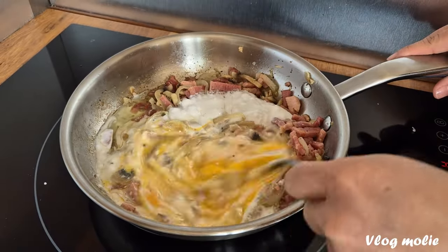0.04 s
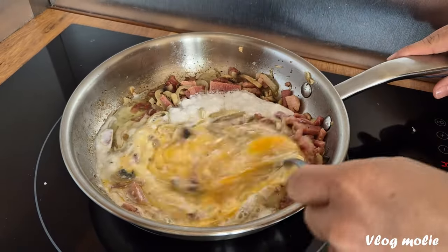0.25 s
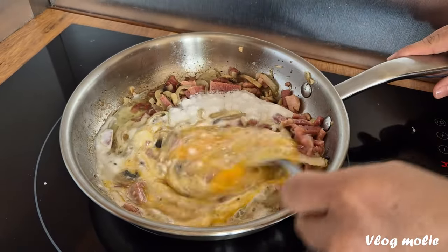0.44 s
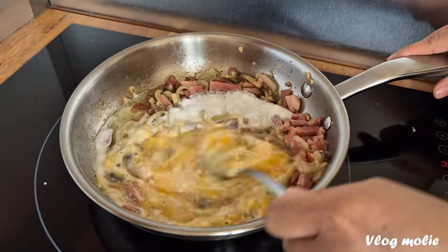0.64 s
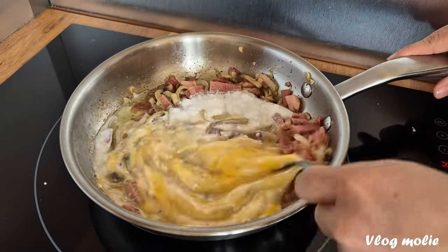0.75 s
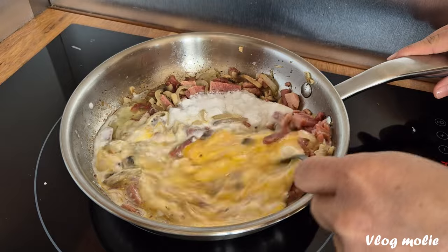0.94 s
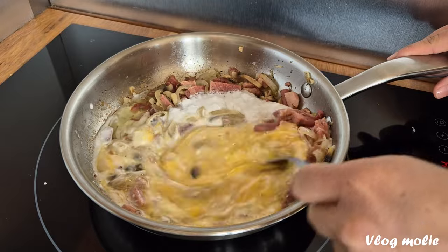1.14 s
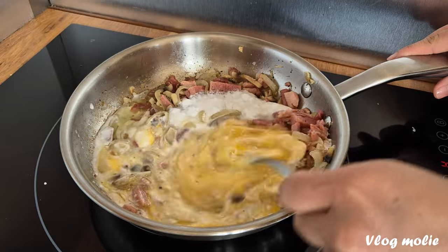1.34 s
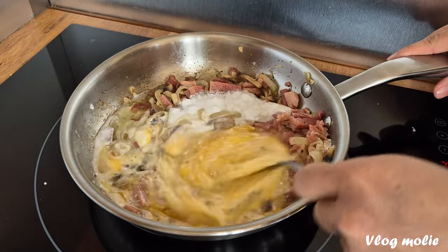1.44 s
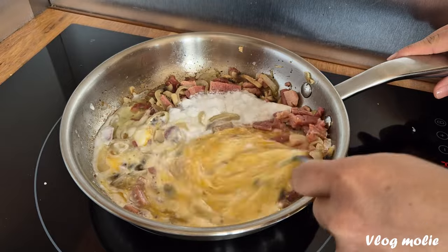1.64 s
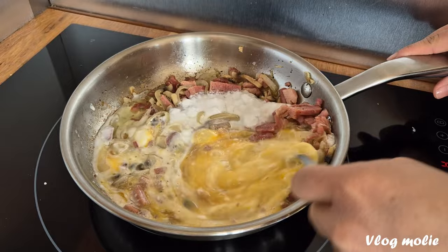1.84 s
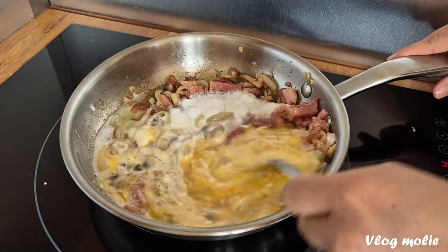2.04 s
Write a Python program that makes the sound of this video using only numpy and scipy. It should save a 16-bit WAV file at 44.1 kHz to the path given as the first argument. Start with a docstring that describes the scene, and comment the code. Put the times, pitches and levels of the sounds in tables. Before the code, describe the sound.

A fork beats eggs in a steel frying pan with quick, wet clacks.

```python
"""A fork beats eggs in a steel frying pan, close by in a small kitchen.
From the start, froth crackles over a low hum and the pan rocks on the hob; the egg smacks and squelches.
From 0.2 s to 2 s come eleven strokes, nearly six a second. At each, the tines clack on the egg-damped
steel, an air pocket plops, the pan thumps, and the fork swishes on with rising pitch.
The egg squelches between strokes and briefly after the last."""
import sys
import numpy as np
from scipy import signal
from scipy.fft import rfft, irfft
from scipy.io import wavfile
from scipy.ndimage import uniform_filter1d

SR = 44100
rng = np.random.default_rng(int(sys.argv[2]) if len(sys.argv) > 2 else 0)


def unload_wav(signal):
    """Save mono or channel-first audio to the path in sys.argv[1] as 16-bit WAV at rate SR, clipped to [-1, 1]."""
    wavfile.write(
        sys.argv[1],
        SR,
        np.round(np.clip(np.atleast_2d(signal).T, -1, 1) * 32767).astype(np.int16),
    )


N = 92610

# Spectra: freq_hz, gain_db
HUM_SPECTRUM = [(20, -34), (45, -1.5), (65, -4), (120, -6), (190, -17), (330, -27), (1000, -34.5),
                (4000, -33.5), (16000, -50.5)]
FROTH_SPECTRUM = [(350, -11), (600, -26), (850, 9), (1200, -1.5), (1600, 3), (3000, 7), (6000, 0),
                  (10000, -7.5), (16000, -22)]
SMACK_SPECTRUM = [(400, -36.5), (1500, -7), (4000, -9.5), (7000, -8), (11000, -18.5), (16000, -20)]
CLACK_SPECTRUM = [(250, -17), (330, -26), (480, -32.5), (620, -34.5), (760, -8), (950, -4), (1200, -19),
                  (1800, -15), (2200, -4), (2550, -5.5), (2900, 3), (3500, -7.5), (4100, 2), (4700, 10),
                  (5300, 1.5), (5900, -12.5), (6450, -5), (7000, -10), (8800, -7.5), (10300, -14),
                  (11900, -8.5), (15500, -20)]
THUD_SPECTRUM = [(40, -18), (130, 1), (200, -22.5), (260, -5), (340, -24.5), (1000, -79.5)]
SWISH_SPECTRUM = [(500, -40), (1500, -58), (2500, -4.5), (4500, 8.5), (9000, 1), (13000, -10), (16000, -53)]
SPRAY_SPECTRUM = [(1000, -37), (5000, -8.5), (8000, 6.5), (11000, -3), (15000, -7)]
# Froth envelope: time_s, gain_db
FROTH_ENVELOPE = [(0, 9), (.08, -3.5), (.15, -9), (.3, -4), (.45, 5), (1.101, 8), (1.6, 3), (2.1, 8)]
# Pushes that rock the pan: start_s, push_db
ROCKS = [(.028, -41), (.2, -38.5), (0.398, -42.5), (0.577, -50), (0.92, -42.5), (1.098, -46),
         (1.281, -49.5), (1.455, -47.5), (1.634, -49.5), (1.81, -54)]
# Rocking modes: pitch_hz, gain_db, t60_s
SWAY_MODES = [(45.1, 3.5, 0.35), (80.2, -2.5, 0.23), (131.5, -6, 0.24)]
# Egg leaving the fork: start_s, level_db, t60_s
SMACKS = [(.101, -47.5, 0.042), (0.246, -55, 0.018), (0.191, -40, 0.071), (0.318, -49.5, 0.027),
          (0.37, -50, 0.057), (0.387, -36, 0.13), (0.712, -44, 0.021), (0.841, -47, .025),
          (.891, -30.5, 0.1), (1.076, -36.5, 0.14), (2.082, -46, 0.061)]
# Air pockets in the egg: start_s, pitch_hz, level_db, t60_s
SQUELCHES = [(.116, 1506, -44.5, 0.038), (.198, 570, -42, 0.089), (.211, 880, -46, 0.055),
             (.261, 810, -41.5, 0.027), (.321, 453, -43.5, 0.067), (.322, 880, -43.5, 0.019),
             (0.321, 1365, -39.5, 0.094), (.324, 2140, -44.5, 0.057), (.436, 1535, -48, 0.019),
             (.496, 1495, -41, 0.025), (.498, 409, -43, 0.052), (.499, 2020, -55, 0.036),
             (.575, 585, -45, 0.13), (.601, 1980, -39.5, 0.014), (.660, 749, -41.5, 0.094),
             (.670, 1390, -49.5, 0.039), (.731, 817, -45, .05), (.841, 2170, -40, 0.026),
             (.878, 887, -39.5, 0.091), (.892, 1570, -37.5, 0.013), (.968, 945, -65, 0.059),
             (1.017, 2290, -46, 0.025), (1.070, 748, -36.5, 0.052), (1.249, 1470, -50, 0.019),
             (1.392, 917, -39.5, 0.12), (1.403, 1350, -52, 0.035), (1.589, 1510, -49, 0.061),
             (1.753, 3590, -43.5, 0.018), (1.828, 883, -38, 0.071), (2.019, 5570, -39.5, 0.01),
             (2.034, 3970, -41, 0.024), (2.081, 865, -50, 0.12), (2.081, 2217, -43, .06)]
# Fork strokes: start_s, clack_low_db, clack_mid_db, clack_top_db, clink_hz,
# plop_hz, plop_db, plop_t60_s, swish_db, swish_peak_s, thump_db
STROKES = [(0.197, -46.5, -50.5, -50, 4580, 825, -31.5, 0.012, -62.5, 0.084, -42),
           (.3950, -25.5, -19.5, -22, 5054, 738, -34, 0.033, -34.5, 0.029, -34),
           (0.5732, -32.5, -21, -23, 5350, 862, -44, 0.02, -37, 0.02, -38.5),
           (0.751, -29, -21.5, -27, 4586, 784, -32, 0.044, -33.5, 0.015, -53),
           (0.9143, -19.5, -22.5, -21, 4780, 885, -20.5, 0.063, -33.5, 0.039, -38),
           (1.0977, -21, -19, -21, 4445, 844, -37, 0.026, -34.5, 0.038, -42.5),
           (1.2799, -24, -20, -24.5, 4693, 790, -34, 0.036, -31.5, 0.036, -42.5),
           (1.4549, -24.5, -23.5, -24, 4540, 846, -32.5, .035, -33, 0.034, -38.5),
           (1.6288, -22, -23, -26.5, 4650, 876.5, -30, 0.063, -37, 0.04, -43),
           (1.8048, -22.5, -23, -29, 5060, 814, -36.5, 0.038, -36, .033, -44),
           (1.9826, -32, -35.5, -37, 3960, 921, -38.5, 0.034, -47, 0.028, -47)]
# Tines landing in turn: delay_s, gain_db
TINES = [(0, 1), (.0008, 12), (.0017, 3.5), (.0027, 4.5), (.0038, -1)]
# Ringing modes of the pan: pitch_hz, gain_db, t60_s
PAN_MODES = [(910, 18, 0.26), (975, 13, 0.78), (1850, -20, 0.23), (2190, -15, .25), (2333, 34, 0.14),
             (2750, -6, 0.22), (2812, -15, .25), (3000, 29, 0.39), (3430, 24, 0.37), (3900, 4.5, 0.096),
             (4300, -23, 0.18), (4500, -24, .2), (4500, -5, .22), (4750, -6, .2), (5600, 10, 0.19),
             (6421, 7, .25), (11896, 3, .12)]
# Room decay: freq_hz, t60_s
KITCHEN_DECAY = [(100, 0.9), (800, 0.33), (2500, 0.34), (5000, 0.27), (9000, 0.24), (15000, 0.31)]

T = np.arange(SR // 2) / SR  # time within one event, s


def amp(db):
    """Decibels to gain."""
    return 10 ** (np.asarray(db) / 20)


def unit_rms(x):
    """Scale to rms 1."""
    return x / np.sqrt(np.mean(x ** 2) + 1e-20)


def burst(x):
    """Scale to the energy of 10 ms at rms 1."""
    return x / np.sqrt(np.mean(np.sum(x ** 2, -1)) / (SR / 100) + 1e-20)


def fade(t60_s, t=T):
    """Exponential decay, 60 dB in t60_s."""
    return np.exp(-np.log(1000) * t / t60_s)


def lookup(table, hz):
    """Interpolate over log frequency."""
    freq_hz, value = np.transpose(table)
    return np.interp(np.log(hz + 1), np.log(freq_hz), value)


def add(mix, start_s, sound):
    """Mix in at start_s."""
    part = mix[:, round(start_s * SR):][:, :sound.shape[-1]]
    part += sound[..., :part.shape[1]]


def colour(x, spectrum):
    """Minimum-phase filter with the given spectrum."""
    log_gain = np.log(amp(lookup(spectrum, abs(np.fft.fftfreq(4096, 1 / SR)))))
    taps = np.fft.ifft(np.exp(np.conj(signal.hilbert(log_gain)))).real
    return signal.fftconvolve(x, taps[None], axes=1)[:, :x.shape[1]]


def stereo_noise(samples=len(T)):
    """White noise, partly shared by the channels."""
    noise = rng.standard_normal((3, samples))
    return 0.6 * noise[0] + 0.8 * noise[1:]


def jitter(smooth_samples):
    """Smoothed noise, rms 1."""
    return unit_rms(uniform_filter1d(rng.standard_normal(len(T)), smooth_samples))


def resonate(x, hz, width_hz):
    """Resonance following a pitch curve."""
    carrier = np.exp(2j * np.pi * np.cumsum(hz) / SR)
    pole = np.exp(-np.pi * width_hz / SR)
    return 2 * (carrier * signal.lfilter([1 - pole], [1, -pole], x / carrier)).real


def hum(level_db=-54):
    """Low, steady room noise, nearly mono."""
    noise = rng.standard_normal(N) + 0.33 * rng.standard_normal((2, N))
    return amp(level_db) * unit_rms(colour(noise, HUM_SPECTRUM))


def froth(base_db=-57.5, spread_db=2.2, pops_per_cycle=0.0275, t60_cycles=20):
    """Tiny bubbles pop in the stirred egg; the higher the pitch, the more often."""
    out, t = np.zeros((2, N)), T[:4000]
    for hz in np.geomspace(400, 15000, 40):
        strength = amp(spread_db * np.minimum(rng.exponential(1, N), 4))
        onsets = rng.random(N) < pops_per_cycle * hz / SR
        pop = np.sin(2 * np.pi * hz * t) * np.sqrt(t * hz) * fade(t60_cycles / hz, t)
        kicks = strength * onsets * stereo_noise(N)
        out += np.sqrt(hz) * signal.oaconvolve(kicks, pop[None], axes=1)[:, :N]
    envelope_db = np.interp(np.arange(N) / SR, *np.transpose(FROTH_ENVELOPE))
    return amp(base_db + envelope_db) * unit_rms(colour(out, FROTH_SPECTRUM))


def rock(push_db, swell_s=0.04):
    """The pushed pan sways on the hob in three low modes."""
    sway = sum(amp(db) * np.sin(2 * np.pi * hz * T) * fade(t60_s) for hz, db, t60_s in SWAY_MODES)
    return 2.9 * amp(push_db) * sway * (1 - np.exp(-T / swell_s))


def smack(level_db, t60_s):
    """Egg leaves the fork: a wet noise burst."""
    return amp(level_db) * burst(colour(stereo_noise() * fade(t60_s), SMACK_SPECTRUM))


def squelch(hz, level_db, t60_s, rise_per_s=1.8, roughness=0.48, attack_s=0.0024):
    """A ragged bubble in thick egg, rising slightly in pitch."""
    glide_hz = hz * (1 + rise_per_s * T)
    width_hz = 0.18 * hz
    envelope = (1 - np.exp(-T / attack_s)) * fade(t60_s)
    ragged = resonate(resonate(stereo_noise(), glide_hz, width_hz), glide_hz, 2 * width_hz)
    clean = np.sin(2 * np.pi * np.cumsum(glide_hz) / SR)
    bubble = (1 - roughness) * burst(clean * envelope) + roughness * burst(ragged * envelope)
    return amp(level_db) * burst(bubble)


def steel_mode(hz, t60_s, attack_s=0.002):
    """One damped mode, its phase a little different per channel."""
    phase = 2 * np.pi * rng.random() + 0.52 * rng.standard_normal((2, 1))
    return burst(np.sin(2 * np.pi * hz * T + phase) * np.minimum(T / attack_s, 1) * fade(t60_s))


def clack(low_db, mid_db, top_db, clink_hz, scatter_db=3):
    """Tines hit the pan: dense damped modes, the base's knock, the fork's clink, a faint ring."""
    hits = np.zeros((2, len(T)))
    envelope = fade(t60_s=0.021) + amp(-7) * fade(t60_s=0.08)
    for delay_s, db in TINES:
        add(hits, delay_s, amp(db) * stereo_noise() * envelope)
    hits = colour(hits, CLACK_SPECTRUM)
    impact = 0
    for band_hz, db in (([200, 3500], low_db), ([3500, 6500], mid_db), ([6500, 18000], top_db)):
        bandpass = signal.butter(4, band_hz, "band", fs=SR, output="sos")
        impact += amp(db) * burst(signal.sosfilt(bandpass, hits))
    ring = sum(amp(db + scatter_db * rng.standard_normal()) * np.sqrt(t60_s) * steel_mode(hz, t60_s)
               for hz, db, t60_s in PAN_MODES)
    knock = amp(low_db - 5.5) * steel_mode(hz=2227, t60_s=0.028)
    clink = amp(mid_db - 3) * steel_mode(clink_hz, t60_s=0.04)
    return impact + knock + clink + amp((low_db + mid_db) / 2 - 15.5) * burst(ring)


def plop(hz, level_db, t60_s, rise_per_s=4, attack_s=0.002):
    """The air pocket behind the fork rings, rising in pitch as it closes."""
    cycles = np.cumsum(hz * (1 + rise_per_s * T)) / SR
    envelope = (1 - np.exp(-T / attack_s)) * fade(t60_s)
    return amp(level_db) * burst(np.sin(2 * np.pi * cycles) * envelope)


def thump(gain_db, pitch_hz=117.4):
    """The blow pushes the whole pan against the hob."""
    tone = np.sin(2 * np.pi * pitch_hz * T) * fade(t60_s=0.066)
    thud = colour(rng.standard_normal((1, len(T))) * fade(t60_s=0.048), THUD_SPECTRUM)
    return amp(gain_db) * (burst(tone) + amp(-3) * burst(thud))


def swish(gain_db, peak_s):
    """Tines slide through egg: grainy hiss with a rising resonance, then fine spray."""
    floor_hz, at_peak_hz, ceiling_hz, bend_s = 4100, 5300, 9300, 0.014
    grain_db, wander, width_hz, whistle_share = 3.2, 0.09, 1500, 0.54
    attack_s, spread_s, spray_lag_s, spray_spread_s = 0.0056, 0.014, 0.014, 0.0072
    rub = stereo_noise() * amp(grain_db * jitter(60))
    sweep_hz = floor_hz + (at_peak_hz - floor_hz) * np.exp((T - peak_s) / bend_s)
    sweep_hz = np.minimum(sweep_hz, ceiling_hz) * (1 + wander * jitter(200))
    whistle = unit_rms(resonate(resonate(rub, sweep_hz, width_hz), sweep_hz, width_hz))
    hiss = unit_rms(colour(rub, SWISH_SPECTRUM))
    slide = unit_rms(whistle_share * whistle + (1 - whistle_share) * hiss)
    slide *= np.minimum(T / attack_s, 1) / np.cosh((T - peak_s) / spread_s)
    spray = unit_rms(colour(rub, SPRAY_SPECTRUM))
    spray /= np.cosh(np.minimum(abs(T - peak_s - spray_lag_s) / spray_spread_s, 20))
    return amp(gain_db) * (slide + amp(-0.5) * spray)


def kitchen(x, gain_db=-9.5, predelay_s=0.003, attack_s=0.0027, low_cut_hz=250):
    """Room reflections: a short diffuse tail, longest in the bass."""
    hz, t, noise = signal.stft(rng.standard_normal((2, len(T))), SR, nperseg=256)
    decay = fade(lookup(KITCHEN_DECAY, hz)[:, None], t)
    tail = signal.istft(noise * decay, SR, nperseg=256)[1][:, :len(T)]
    tail *= np.clip((T - predelay_s) / attack_s, 0, 1)
    highpass = signal.butter(2, low_cut_hz, "high", fs=SR, output="sos")
    tail = signal.sosfilt(highpass, tail / np.linalg.norm(tail[0]))
    return amp(gain_db) * signal.fftconvolve(x, tail, axes=1)[:, :N]


def scene():
    """The pan, slightly left of centre, in the humming kitchen."""
    right_lag_s, tilt_db = 76e-6, 1.03
    pan = froth()
    for (start_s, low_db, mid_db, top_db, clink_hz,
         plop_hz, plop_db, plop_t60_s, swish_db, swish_peak_s, thump_db) in STROKES:
        add(pan, start_s, clack(low_db, mid_db, top_db, clink_hz))
        add(pan, start_s, plop(plop_hz, plop_db, plop_t60_s))
        add(pan, start_s, swish(swish_db, swish_peak_s))
        add(pan, start_s, thump(thump_db))
    for start_s, pitch_hz, level_db, t60_s in SQUELCHES:
        add(pan, start_s, squelch(pitch_hz, level_db, t60_s))
    for start_s, level_db, t60_s in SMACKS:
        add(pan, start_s, smack(level_db, t60_s))
    delay = np.exp(-2j * np.pi * np.fft.rfftfreq(N, 1 / SR) * right_lag_s)
    pan[1] = irfft(rfft(pan[1]) * delay, N)
    out = hum() + (pan + kitchen(pan)) * amp([[tilt_db], [-tilt_db]])
    for start_s, push_db in ROCKS:
        add(out, start_s, rock(push_db))
    return out


def record(dry):
    """Steep low-pass."""
    cutoff_hz = 15900
    taps = signal.firwin(301, cutoff_hz, window=("kaiser", 8), fs=SR)
    return signal.oaconvolve(dry, taps[None], "same")


dry = scene()
out = record(dry)
unload_wav(out)
```